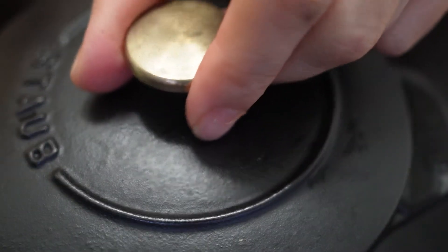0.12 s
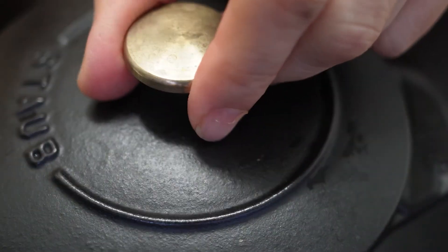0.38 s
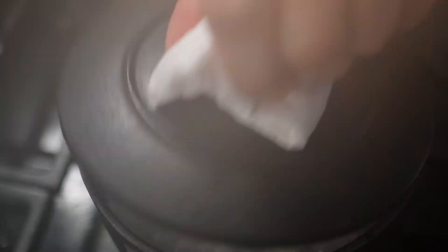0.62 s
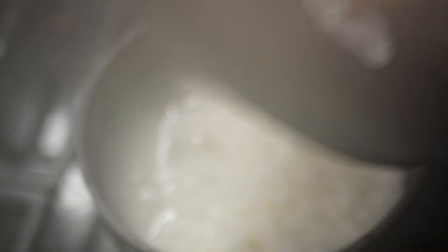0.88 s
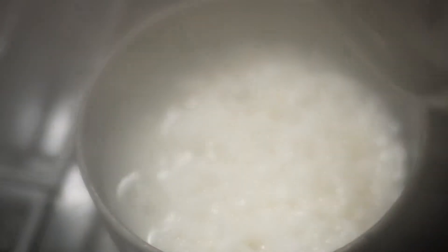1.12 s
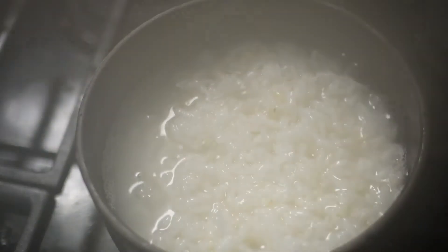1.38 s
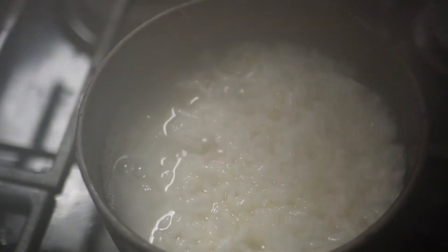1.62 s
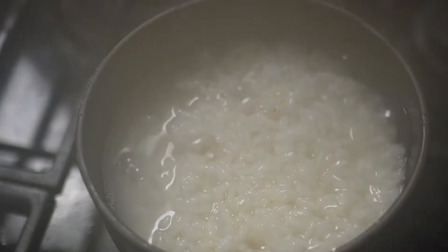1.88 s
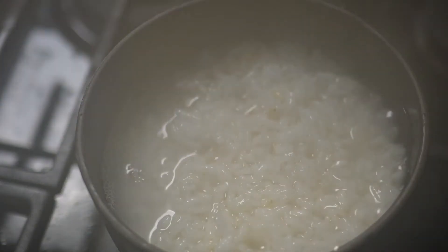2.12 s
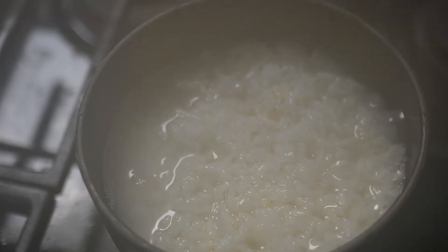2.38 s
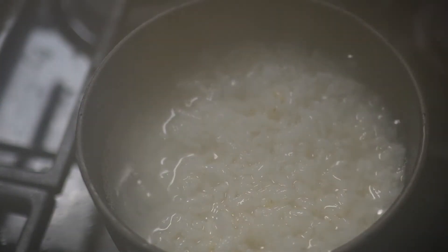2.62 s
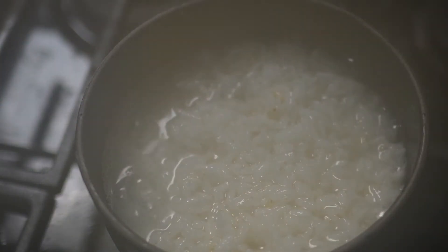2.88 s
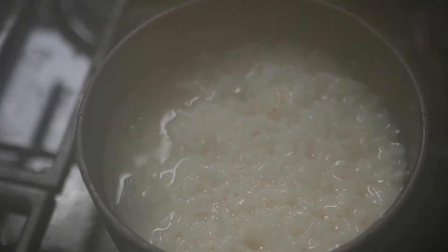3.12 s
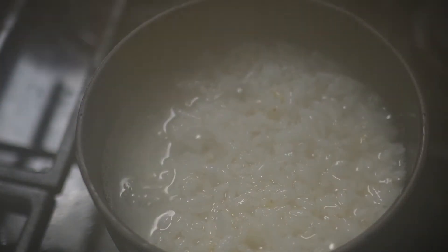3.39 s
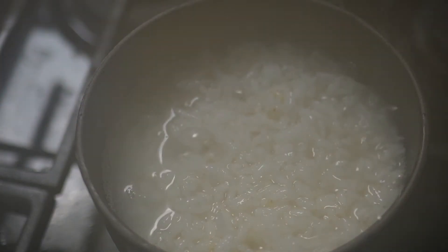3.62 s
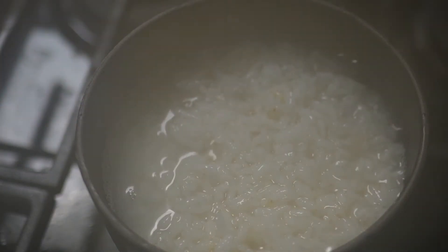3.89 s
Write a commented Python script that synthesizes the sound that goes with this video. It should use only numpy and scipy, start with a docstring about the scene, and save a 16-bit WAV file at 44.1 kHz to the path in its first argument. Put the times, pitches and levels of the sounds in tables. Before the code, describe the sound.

Rice simmering in a pot, small quick bubbles popping, following a short cast-iron lid rattle.

```python
"""Cast-iron lid over simmering rice

Fingers rattle a cast-iron lid on its pot and let it clank, as decaying modes over noise; then it is lifted off.
Rice simmers below: small bubbles burst as chirps that ring in the open pot, bigger ones pop singly.
The air under the tilted lid resonates, a few drops tick as short shaped noise and a soft hiss passes.
The kitchen is faint filtered noise with three wavering tones."""
import sys
import numpy as np
from scipy import signal
from scipy.fft import rfft, irfft
from scipy.io import wavfile
from scipy.ndimage import uniform_filter1d

SR = 44100
rng = np.random.default_rng(int(sys.argv[2]) if len(sys.argv) > 2 else 0)


def magnitude_from_level(level_db):
    """Linear magnitude for a level in decibels (20 dB per decade)."""
    exponent = np.asarray(level_db, float) / 20
    return 10 ** exponent


def put_to_file(sound):
    """Save the sound as 16-bit audio at rate SR, in the file named by the first command-line argument."""
    columns = np.atleast_2d(sound).T  # one column per channel
    safe = np.clip(columns, -1, 1)
    whole_steps = np.round(safe * 32767)
    wavfile.write(sys.argv[1], SR, whole_steps.astype(np.int16))


N = 176400  # samples, 4 s


def curve(rows, col=1, outside=None):
    """Linear interpolation: one column of a time table, at every sample."""
    rows = np.array(rows)
    return np.interp(np.arange(N) / SR, rows[:, 0], rows[:, col], outside, outside)


def evened(x):
    """Power normalisation: scales to rms 1."""
    return x / np.sqrt(np.mean(x ** 2) + 1e-20)


def read(points, hz):
    """Log-frequency interpolation: a spectrum table at the frequencies hz."""
    f, value = np.transpose(points)
    return np.interp(np.log(hz + 1), np.log(f + 1), value)


def add(mix, s, sound):
    """Superposition: mixes a sound in at s seconds."""
    part = mix[round(s * SR):][:len(sound)]
    part += sound[:len(part)]


def colour(x, points):
    """Minimum-phase filtering: the Hilbert transform of the log gain gives a causal filter."""
    hz = np.abs(np.fft.fftfreq(4096, 1 / SR))
    log_gain = np.log(magnitude_from_level(np.maximum(read(points, hz), -100)))
    taps = np.fft.ifft(np.exp(np.conj(signal.hilbert(log_gain)))).real[:2048]
    if x.ndim > 1:
        taps = taps[None]
    return signal.oaconvolve(x, taps, axes=-1)[..., :x.shape[-1]]


def resonate(x, hz, width):
    """Heterodyne resonance: shifts hz to zero, smooths with a one-pole filter and shifts back."""
    turn = np.exp(2j * np.pi * np.cumsum(hz * np.ones(len(x))) / SR)
    r = np.exp(-np.pi * width / SR)
    return 2 * (turn * signal.lfilter([1 - r], [1, -r], x / turn)).real


SPLIT, TWIN_DB = 0.0087, -10  # relative spacing of a mode pair, level of its weaker partner
WOBBLE_DB = 3.5
BLOOM_HZ, BLOOM_S = 4800, 0.0084  # modes above BLOOM_HZ swell in


def rings(hz, db, t60, t):
    """Modal synthesis: near-degenerate pairs beat and decay, wobbling in level as the lid rocks."""
    hz = np.concatenate([hz, hz * (1 + SPLIT)])[:, None]
    db = np.concatenate([db, db + TWIN_DB])[:, None]
    t60 = np.tile(t60, 2)[:, None]
    wobble = np.array([np.interp(t * 60, np.arange(100), k) for k in rng.standard_normal((len(hz), 100))])
    sign = (-1) ** np.arange(len(hz))[:, None]
    bloom = np.where(hz > BLOOM_HZ, 1 - 0.67 * np.exp(-t / BLOOM_S), 1)
    level = magnitude_from_level(db - 60 * t / t60 + WOBBLE_DB * wobble)
    modes = sign * bloom * level * np.sin(2 * np.pi * hz * t)
    return modes.sum(0) * np.minimum(t / 0.00038, 1)


# modes of the lid on the pot: frequency [Hz]
LID_MODES_HZ = [442, 528, 614, 797, 1435, 1817, 3109, 3445, 3791, 3977, 4149, 4411, 5537, 6536, 7001, 7475,
                10118, 10873, 13542, 14690, 15250]
# the same modes: (light-tap level [dB], hard-clank level [dB], t60 [s])
LID_MODES = [(-11.5, -20, 0.46), (-5.5, -23, 0.076), (-23.5, -34, 0.64), (1.5, -24.5, 0.13),
             (-13, -17.5, 0.16), (-3, -11.5, 0.24), (-21.5, 1, 0.098), (-32, -19, 0.26), (-11, -5.5, 0.34),
             (-28, -3.5, 0.17), (-3.5, -21, 0.28), (-30, -24, 0.13), (-3.5, 3, 0.16), (-29, -22, 0.27),
             (-20.5, -0.5, 0.21), (-26, -11.5, 0.22), (-21.5, -19.5, 0.21), (-20, -16.5, 0.13),
             (-25, -23.5, 0.26), (-37, -31, .3), (-20, -34, 0.14)]
# finger blows: (time [s], level [dB], hardness [0-1], thud level [dB])
LID_BLOWS = [(0.0005, -48.5, 0.15, -50.5), (0.0124, -40.5, 0.17, -48), (0.08, -52.5, 0, -54.5),
             (.103, -53, 0.67, -65.5), (0.165, -71, 0., -46), (0.1744, -31, 0.99, -33.5),
             (0.1779, -32, 0.95, -47), (.205, -43, 0.84, -46), (.235, -47, 0.57, -41)]
# dense ring of pot and lid: (frequency [Hz], relative level [dB per Hz])
THUD_SPECTRUM = [(59, -79), (100, -41), (434, -11.5), (2270, -8), (3840, -7), (5600, -18), (5960, -23.5),
                 (7200, -12.5), (8400, -47), (15000, -59)]
# gritty rub of light taps and of the lifting rim: (frequency [Hz], relative level [dB per Hz])
RUB_SPECTRUM = [(59, -57), (100, -28.5), (443, -2.5), (962, -7.5), (1840, -7.5), (2630, -26), (4260, -11),
                (4730, -48), (5370, -20.5), (15000, -49)]
THUD_T60, RUB_T60 = 0.11, 0.29  # s
GRIP_S, GRIP_DB_PER_S, GRIP_ABOVE_HZ = 0.22, 177, 1360  # the hand then damps the lid


def lid():
    """Impact excitation: blows ring the modes over a thud or a rub; the grip adds damping."""
    ring, thud, rub = np.zeros(N), np.zeros(N), np.zeros(N)
    t = np.arange(SR // 3) / SR
    hz = np.array(LID_MODES_HZ)
    light_db, hard_db, t60 = np.transpose(LID_MODES)
    for s, db, hard, thud_db in LID_BLOWS:
        mode_db = light_db + hard * (hard_db - light_db)
        add(ring, s, magnitude_from_level(db) * rings(hz, mode_db, t60, t))
        add(thud, s, hard * magnitude_from_level(thud_db - 60 * t / THUD_T60))
        add(rub, s, (1 - hard) * magnitude_from_level(thud_db - 60 * t / RUB_T60))
    body = thud * evened(colour(rng.standard_normal(N), THUD_SPECTRUM))
    body += rub * evened(colour(rng.standard_normal(N), RUB_SPECTRUM))
    low = signal.lfilter(*signal.butter(2, GRIP_ABOVE_HZ, fs=SR), ring)  # the lowest modes ring on
    grip = magnitude_from_level(-GRIP_DB_PER_S * np.maximum(np.arange(N) / SR - GRIP_S, 0))
    return low + (ring - low + body) * grip


# modes of the lifted lid: (frequency [Hz], level [dB], t60 [s])
FREE_MODES = [(346, -7, 0.8), (376, -8, 0.51), (619, -17.5, 0.36), (3020, -23, 1.2), (3768, -6, 0.4),
              (5486, -7.5, 0.12), (7000, -10, 0.25), (7400, -15, 0.16), (10100, -19, 0.14),
              (13450, -20, 0.14), (15090, -22.5, 0.17)]
# the rim scrapes off: (time [s], level [dB])
RIM_SCRAPES = [(.456, -71), (0.5182, -59.5), (.53, -55.5), (.545, -63)]
RUMBLE_S, RUMBLE_HZ, RUMBLE_DB, RUMBLE_T60 = 0.52, 172, -73, 1  # low rumble as the lid comes off


def lift():
    """Free vibration: the rim scrapes loose, the lid rings in the air over resonant low noise."""
    out, t = np.zeros(N), np.arange(SR // 2) / SR
    for s, db in RIM_SCRAPES:
        grit = evened(colour(rng.standard_normal(len(t)), RUB_SPECTRUM))
        scrape = np.minimum(t / 0.0037, 1) * magnitude_from_level(-1.5 - 60 * t / 0.057) * grit
        add(out, s, magnitude_from_level(db) * (rings(*np.transpose(FREE_MODES), t) + scrape))
    rumble = resonate(rng.standard_normal(len(t)), RUMBLE_HZ, 95)
    rumble = evened(resonate(rumble, RUMBLE_HZ, 150))
    add(out, RUMBLE_S, magnitude_from_level(RUMBLE_DB - 60 * t / RUMBLE_T60) * np.minimum(t / 0.035, 1) * rumble)
    return out


BUBBLES_PER_S, SPREAD_DB, CLUMP_DB, BLUR_DB = 1300, 3.5, 5, -2


def bursts():
    """Poisson-like process: a clumped train of bursts, a few large, over a blur of tiny ones."""
    slow = uniform_filter1d(uniform_filter1d(rng.standard_normal(N), 350), 350)
    clump = magnitude_from_level(CLUMP_DB * np.tanh(evened(slow)))
    size = magnitude_from_level(SPREAD_DB * np.minimum(rng.exponential(1, N), 3))
    size = size * (rng.random(N) < BUBBLES_PER_S / SR)
    train = evened(size * rng.choice([-1., 1.], N))
    return clump * (train + magnitude_from_level(BLUR_DB) * rng.standard_normal(N))


# resonances of the pot: (frequency [Hz], width [Hz], level [dB])
POT_MODES = [(1060, 270, -12), (1670, 98, -1), (2150, 100, 2), (2450, 110, -6), (2850, 340, -18.5),
             (3240, 270, -9.5)]
# fizz of the bursting bubbles: (frequency [Hz], relative level [dB per Hz])
FIZZ_SPECTRUM = [(180, -54.5), (300, -24), (505, -18), (1060, -1), (1430, -5.5), (1670, -3), (1840, -5),
                 (2440, 3), (3510, -4), (5380, -20), (13000, -61.5)]
ECHO_S, ECHO, RING_DB = 0.001844, 0.1, -5  # bounce across the pot and its gain, level of the resonances


def in_pot(x):
    """Cavity acoustics: recirculating bounces across the pot plus its resonances."""
    feedback = np.zeros(round(ECHO_S * SR) + 1)
    feedback[0], feedback[-1] = 1, -ECHO
    bounced = signal.lfilter([1], feedback, colour(x, FIZZ_SPECTRUM))
    ringing = sum(magnitude_from_level(db) * resonate(x, hz, width) for hz, width, db in POT_MODES)
    return bounced + magnitude_from_level(RING_DB) * ringing


# bubbling: (time [s], level [dB], share of small bright bubbles [dB per octave])
BOIL_COURSE = [(.3, -80.5, -10), (.5, -75.5, 0.5), (.6, -72, 8.5), (.8, -66.5, 3.5), (.95, -67, 2.5),
               (1.0, -66, 2), (1.2, -63.5, -6.5), (1.35, -69.5, -3.5), (1.45, -65.5, -2), (1.55, -61, -0.5),
               (1.63, -69, -1), (1.9, -65.5, -0.5), (2.05, -65.5, 0), (2.2, -67, -1.5), (2.35, -68, -1.5),
               (2.45, -60.5, 0), (2.57, -66.5, 1), (2.67, -61.5, 0), (2.82, -66, -1.5), (2.9, -69.5, -1),
               (3.15, -69.5, -3.5), (3.3, -66.5, -0.5), (3.4, -67, 1.5), (3.49, -62, 2.5),
               (3.57, -59.5, 2.5), (3.68, -62.5, 3), (3.77, -66, -2.5), (3.82, -65.5, -3),
               (3.86, -70.5, -1.5), (3.9, -60, -1.5), (3.93, -72.5, 0), (3.96, -62, 1), (4.0, -65.5, -2)]


def simmer():
    """Bubble resonance: the smaller the bubble, the higher its short rising chirp; all ring in the pot."""
    bright_db = curve(BOIL_COURSE, 2)
    drive, kind, out = bursts(), rng.integers(0, 24, N), np.zeros(N)
    for k, hz in enumerate(np.geomspace(600, 7000, 24)):
        u = np.arange(0, 12., hz / SR)  # time in cycles
        chirp = np.minimum(u / 0.39, 1) * np.exp(-u / 1.8) * np.sin(2 * np.pi * (u + 0.015 * u ** 2))
        share = magnitude_from_level(bright_db * np.log2(hz / 2300))
        out += signal.oaconvolve(drive * (kind == k) * share, chirp * (hz / 1000) ** 1.27)[:N]
    return magnitude_from_level(curve(BOIL_COURSE, 1, -110)) * evened(in_pot(out))


# air under the tilted lid: (time [s], lower resonance [Hz], level [dB])
GAP_COURSE = [(0.52, 805, -78), (0.534, 765, -65.5), (0.576, 794, -72), (0.666, 970, -61.5),
              (0.722, 1053, -70), (0.96, 905, -69.5), (0.986, 990, -93), (1.028, 1028, -57.5),
              (1.05, 1040, -72), (1.132, 926, -86), (1.164, 1030, -52.5), (1.184, 945, -67.5),
              (1.238, 1060, -57), (1.32, 1010, -92)]
GAP_WIDTH_HZ = 130
GAP_UPPER, GAP_UPPER_DB = 1.5, -11.5  # second resonance: frequency ratio and level


def under_lid(x):
    """Air-cavity resonance: two moving resonances of the air under the tilted lid."""
    hz = curve(GAP_COURSE)
    lower = resonate(resonate(x, hz, GAP_WIDTH_HZ), hz, 700)
    return lower + magnitude_from_level(GAP_UPPER_DB) * resonate(x, GAP_UPPER * hz, 2 * GAP_WIDTH_HZ)


def gap():
    """Source-filter principle: bursts excite the air under the lid; its pitch wavers upward as the lid opens."""
    drive = bursts()
    return under_lid(magnitude_from_level(curve(GAP_COURSE, 2, -120)) * drive) / under_lid(drive).std()


# big bubbles: (time [s], level going into the pot [dB], starting pitch [Hz])
BIG_BUBBLES = [(0.614, -42, 885), (0.658, -41.5, 970), (0.812, -56, 2330), (0.868, -56, 2520),
               (0.95, -42.5, 2440), (1.012, -46.5, 1000), (1.024, -43.5, 1030), (1.037, -46.5, 2160),
               (1.159, -49, 1010), (1.189, -45.5, 1060), (1.215, -52, 1060), (1.247, -45.5, 1040),
               (1.294, -58, 2030), (1.372, -45.5, 1700), (1.428, -45, 2200), (1.535, -43.5, 2370),
               (1.588, -59, 2210), (1.694, -56, 2150), (1.788, -52, 2300), (1.849, -51.5, 2260),
               (1.866, -50, 1900), (1.986, -57, 2400), (1.999, -47, 2520), (2.003, -45, 1660),
               (2.092, -52, 1110), (2.108, -53.5, 2600), (2.313, -47, 1310), (2.394, -53, 2080),
               (2.463, -48.5, 2340), (2.499, -43, 2150), (2.539, -46, 2540), (2.587, -38.5, 2820),
               (2.651, -53, 2580), (2.681, -54, 2440), (2.718, -55, 2550), (2.817, -49, 2400),
               (3.173, -49, 2070), (3.38, -51, 2630), (3.482, -48.5, 2580), (3.545, -47, 2520),
               (3.563, -48.5, 2450), (3.64, -50, 2690), (3.722, -47.5, 1500), (3.739, -48.5, 2180),
               (3.794, -49.5, 2770), (3.807, -45.5, 1700), (3.823, -49, 1600), (3.868, -51, 1300),
               (3.898, -46.5, 1710), (3.938, -47.5, 2080), (3.954, -54.5, 1100)]
POP_T60, SPLASH, SNAP = 0.0068, 0.79, 1.9  # decay [s]; noise and click relative to the tone
LID_GONE_S = 1.3


def pops():
    """Transient plus resonance: a snap, a brief rising tone and a splash, in the pot and under the lid."""
    out, t = np.zeros(N), np.arange(1000) / SR
    for s, db, hz in BIG_BUBBLES:
        tone = np.sin(2 * np.pi * hz * t * (1 + 8 * t)) + SPLASH * rng.standard_normal(len(t))
        envelope = magnitude_from_level(-60 * t / POP_T60) * np.minimum(t / 0.00034, 1)
        add(out, s, magnitude_from_level(db) * (envelope * tone + SNAP * np.exp(-t / 0.00006)))
    under = under_lid(out) * (np.arange(N) < LID_GONE_S * SR)
    return magnitude_from_level(1.0) * in_pot(out) + magnitude_from_level(-12.0) * under


# drops: (time [s], level [dB], tail level re tick [dB], tilt [dB per octave])
DROP_TICKS = [(0.7354, -58, -14, -13.5), (0.929, -53.5, -9.5, -13.5), (1.0808, -38, -29, 0),
              (1.137, -65, -21, 6), (1.1444, -66, -7, 0.5), (1.1513, -63.5, -26, 4),
              (1.8226, -63.5, -20, -2.5), (2.3963, -62.5, -5, -9.5), (2.7294, -57, -10, -12.5),
              (2.916, -63.5, -16, -11), (3.0376, -59, -17, -13.5), (3.0816, -57, -18.5, -1.5),
              (3.6974, -58, -32, -12)]
# sound of a drop: (frequency [Hz], relative level [dB per Hz])
TICK_SPECTRUM = [(300, -96), (710, -37.5), (1200, -19), (1930, -12.5), (2470, -3.5), (3690, 4),
                 (8750, -9.5), (13800, -21.5), (15800, -33.5)]
TICK_T60, TAIL_T60, TICK_SNAP = 0.0084, 0.33, 0.87  # s, s, extra onset amplitude


def ticks():
    """Two-stage decay: sharp noise ticks with a splashy tail, some brighter than others."""
    out, t = np.zeros(N), np.arange(SR // 4) / SR
    for s, db, tail_db, tilt_db in DROP_TICKS:
        decay = magnitude_from_level(db - 60 * t / TICK_T60) + magnitude_from_level(db + tail_db - 60 * t / TAIL_T60)
        shape = (1 + TICK_SNAP * np.exp(-t / 0.00043)) * decay
        noise = rng.standard_normal(len(t))
        tilted = [(f, d + tilt_db * np.log2(f / 4000)) for f, d in TICK_SPECTRUM]
        steady, struck = colour(np.array([noise, noise * shape]), tilted)
        add(out, s, struck / steady.std())
    return out


# steam: (time [s], level [dB])
STEAM_COURSE = [(1.2, -89), (1.234, -86), (1.302, -83.5), (1.508, -75), (1.578, -86.5), (1.7, -89)]
# its hiss: (frequency [Hz], relative level [dB per Hz])
HISS_SPECTRUM = [(2060, -32), (3500, -10), (4040, 3), (4380, -1), (10400, -9), (13000, -26)]


def steam():
    """Broadband noise: filtered noise under an envelope makes a short soft hiss."""
    return magnitude_from_level(curve(STEAM_COURSE, 1, -130)) * evened(colour(rng.standard_normal(N), HISS_SPECTRUM))


# kitchen air: (frequency [Hz], relative level [dB per Hz])
AIR_SPECTRUM = [(35, -40), (60, -21), (110, -14.5), (230, -16.5), (420, -17.5), (620, -12), (964, -17),
                (1900, -22.5), (5000, -18), (12300, -29.5), (13500, -43), (15800, -53)]
# left-right likeness of the air: (frequency [Hz], correlation [-1 to 1])
AIR_LIKENESS = [(60, 0.69), (180, 0.99), (550, 0.7), (1650, 0.82), (4970, 0.49), (15000, 0.21)]
# steady tones: (frequency [Hz], level before wavering [dB rms])
HUM_TONES = [(120, -101), (232, -99), (3018, -86.5)]
AIR_DB = -80.5


def kitchen():
    """Interchannel coherence: quiet air noise, most alike in the bass, under faint wavering hum."""
    z, hz = rfft(rng.standard_normal((2, N))), np.fft.rfftfreq(N, 1 / SR)
    same = np.clip(read(AIR_LIKENESS, hz), -1, 1)
    pair = np.array([z[0], same * z[0] + np.sqrt(1 - same ** 2) * z[1]])
    air = irfft(pair * magnitude_from_level(read(AIR_SPECTRUM, hz)), N)
    hum, t = np.zeros(N), np.arange(N) / SR
    waver = uniform_filter1d(rng.standard_normal((len(HUM_TONES), N)), 4000)
    for (f, db), w in zip(HUM_TONES, waver):
        hum += magnitude_from_level(db + 5.4 * evened(w)) * np.sqrt(2) * np.sin(2 * np.pi * f * t)
    return magnitude_from_level(AIR_DB) * evened(air) + hum


def room(x, t60):
    """Reverberation: sparse decaying reflections, other ones for each ear, thinner in the bass."""
    t = np.arange(SR // 2) / SR
    taps = rng.standard_normal((2, len(t))) * (rng.random((2, len(t))) < 0.1)
    taps = taps * magnitude_from_level(-60 * t / t60) * (t > 0.002)
    taps = colour(taps, [(200, -28.5), (700, -5.5), (3000, -3.0), (12000, 1.0)])
    return signal.fftconvolve(x[None], taps / np.linalg.norm(taps[0]), axes=1)[:, :N]


WIDE_HZ, SLAP_S = 1500, 0.0004  # treble from here; delay of a near reflection


def panned(x, db, slap_db):
    """Level difference: leans the treble aside; a reflection of opposite sense in each ear widens it."""
    top = signal.lfilter(*signal.butter(2, WIDE_HZ, "high", fs=SR), x)
    side = np.array([[1.], [-1.]])
    late = np.concatenate([np.zeros(round(SLAP_S * SR)), top])[:N]
    return x + (magnitude_from_level(db * side / 2) - 1) * top + side * magnitude_from_level(slap_db) * late


LID_PAN_DB, LID_SLAP_DB, LID_ROOM_T60, LID_ROOM_DB = 2, -11, 0.37, -12
BOIL_PAN_DB, BOIL_SLAP_DB, ROOM_T60, ROOM_DB = -3.5, -21, 0.084, -4.5


def scene():
    """Superposition: rattled lid to the left, pot and lifted lid to the right, in a small kitchen."""
    iron = lid()
    boil = lift() + simmer() + gap() + pops() + ticks() + steam()
    wet = magnitude_from_level(LID_ROOM_DB) * room(iron, LID_ROOM_T60) + magnitude_from_level(ROOM_DB) * room(boil, ROOM_T60)
    direct = panned(iron, LID_PAN_DB, LID_SLAP_DB) + panned(boil, BOIL_PAN_DB, BOIL_SLAP_DB)
    return direct + wet + kitchen()


def roll_off(x):
    """The treble ends steeply here."""
    return signal.sosfilt(signal.butter(12, 15990, fs=SR, output="sos"), x)


def record(dry):
    """High-pass response: a small microphone with little bass below 159 Hz."""
    thin = signal.sosfilt(signal.butter(4, 159, "high", fs=SR, output="sos"), dry)
    return roll_off(thin)


dry = scene()
out = record(dry)
put_to_file(out)
```